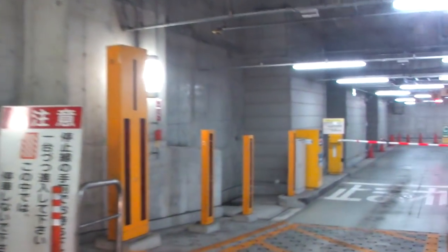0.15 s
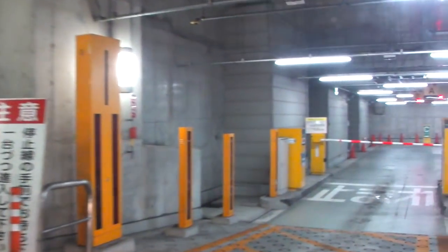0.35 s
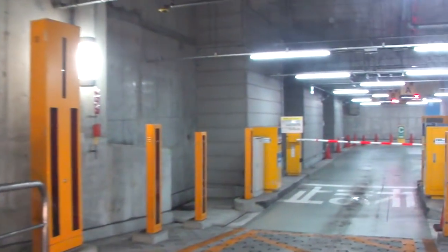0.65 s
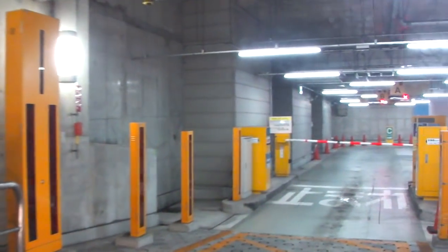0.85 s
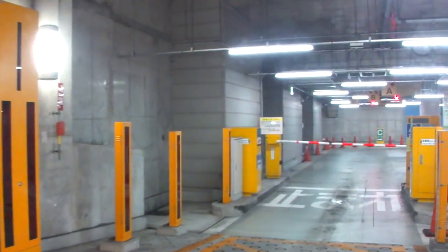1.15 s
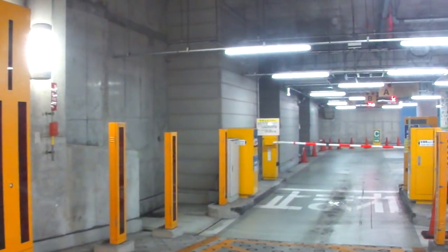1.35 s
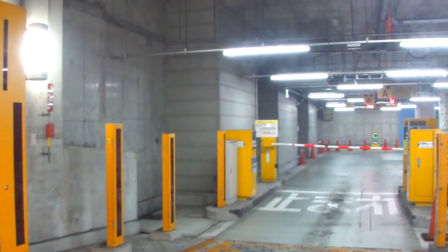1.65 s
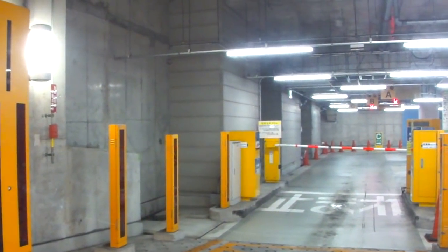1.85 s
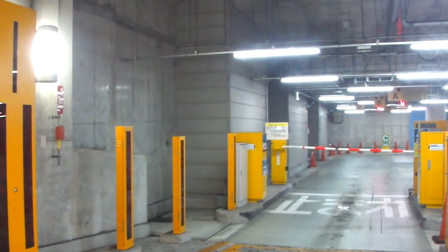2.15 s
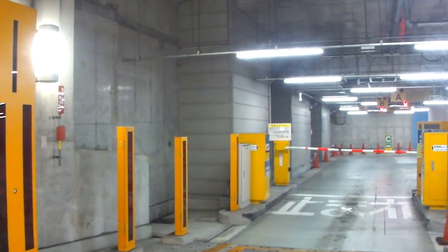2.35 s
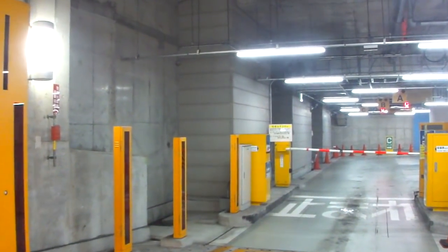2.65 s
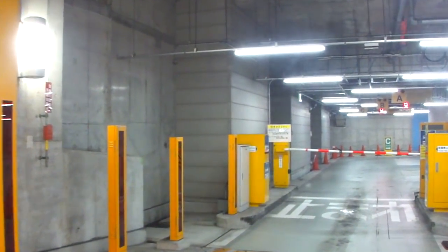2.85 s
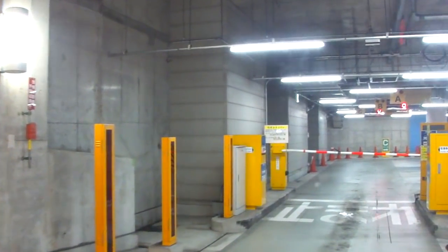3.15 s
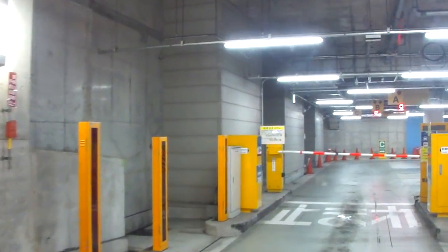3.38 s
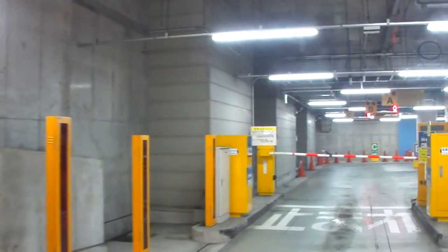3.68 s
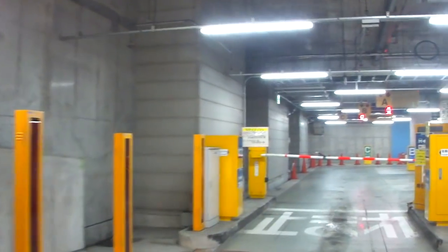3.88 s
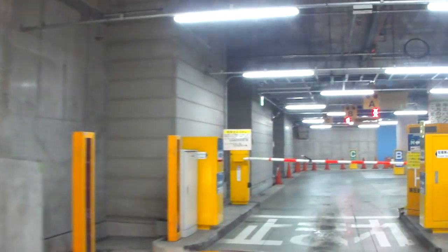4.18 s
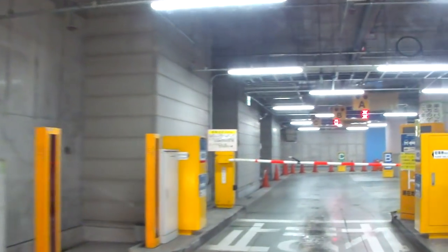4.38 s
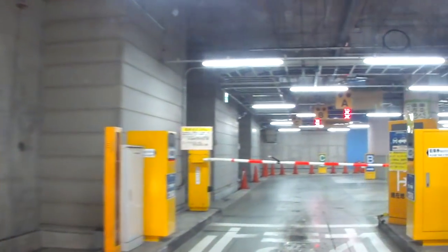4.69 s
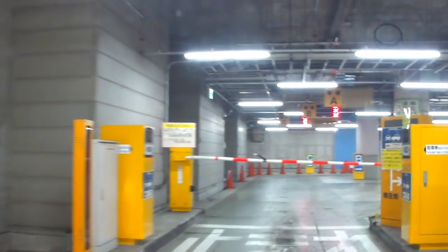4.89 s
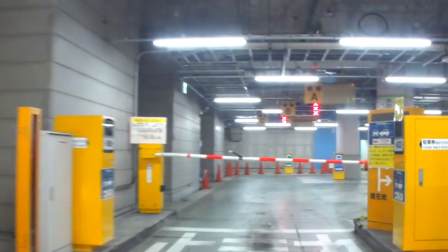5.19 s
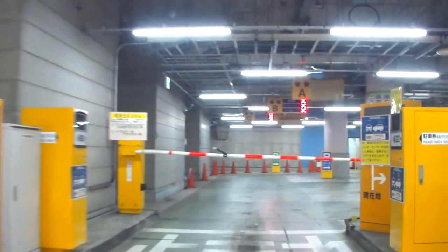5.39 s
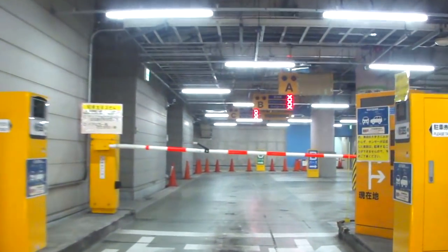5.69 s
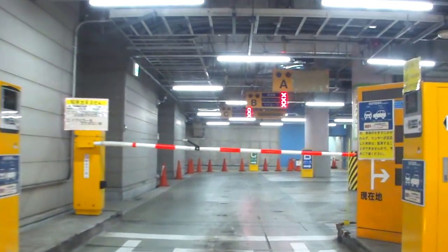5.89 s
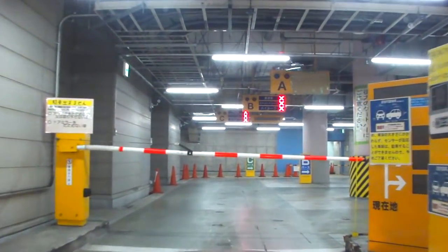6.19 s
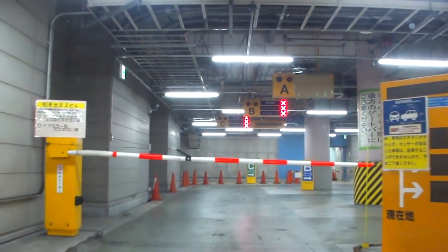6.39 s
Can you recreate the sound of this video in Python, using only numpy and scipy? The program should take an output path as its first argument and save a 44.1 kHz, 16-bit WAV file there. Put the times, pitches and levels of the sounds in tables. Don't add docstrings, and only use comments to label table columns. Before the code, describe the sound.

Muffled cabin rumble and a wavering drivetrain moan as a car rolls, slows, then rolls on over joints with thuds, ticks and faint hiss.

```python
import sys
import numpy as np
from scipy import signal
from scipy.io import wavfile
from scipy.ndimage import uniform_filter1d

SR = 44100
rng = np.random.default_rng(int(sys.argv[2]) if len(sys.argv) > 2 else 0)


def ratio_of_db(decibels):
    return 10 ** (np.asarray(decibels, float) / 20)


def wrap_up_sound(samples):
    columns = np.atleast_2d(samples).T
    tamed = np.clip(columns, -1, 1)
    steps = np.round(tamed * 32767).astype(np.int16)
    wavfile.write(sys.argv[1], SR, steps)


N = 288144


def evened(x):
    return x / np.sqrt(np.mean(x ** 2) + 1e-20)


def read(points, hz):
    f, value = np.transpose(points)
    return np.interp(np.log(hz + 1), np.log(f + 1), value)


def add(mix, start_s, sound):
    part = mix[..., round(start_s * SR):][..., :sound.shape[-1]]
    part += sound[..., :part.shape[-1]]


def resonate(x, hz, width_hz):
    turn = np.exp(2j * np.pi * np.cumsum(hz * np.ones(len(x))) / SR)
    r = np.exp(-np.pi * width_hz / SR)
    smooth = signal.lfilter([1 - r], [1, -r], x / turn + 1e-18)
    return 2 * (turn * smooth).real


def noise_band(length, hz, width_hz):
    once = resonate(rng.standard_normal(length), hz, width_hz)
    return resonate(once, hz, width_hz)


def ring(hz, t60_s, phase=0):
    t = np.arange(6000) / SR
    swell = np.sin(np.pi / 2 * np.minimum(t * hz, 1)) ** 2
    return ratio_of_db(-60 * t / t60_s) * np.sin(2 * np.pi * hz * t + phase) * swell


def field_axes(size):
    t = np.arange(-2, N * 4 // size + 6) * size / 4 / SR
    return np.fft.rfftfreq(size, 1 / SR), t


def field(level_db, same, lean_db, size, patchy_db, flicker_db):
    a, b, c, d, patches = rng.standard_normal((level_db.shape[1], size // 2 + 1, 5)).T
    flicker = evened(uniform_filter1d(patches, size // 16, 0))
    patches = uniform_filter1d(patches[::-1], size // 256 + 2, 0)
    patches = evened(uniform_filter1d(patches, 12, 1))
    same = np.clip(same, -1, 1)
    left = a + 1j * b
    right = same * left + np.sqrt(1 - same ** 2) * (c + 1j * d)
    z = np.array([left * ratio_of_db(lean_db / 2), right / ratio_of_db(lean_db / 2)])
    z *= ratio_of_db(level_db + patchy_db * patches + flicker_db * flicker)
    z *= np.sqrt(3 / 8)
    sound = signal.istft(z, nperseg=size, noverlap=size * 3 // 4)[1]
    return sound[:, size // 2:N + size // 2]


# low_hz [Hz], high_hz [Hz]
PART_BANDS = [(30, 130), (130, 400), (400, 1000), (1000, 2600)]
# level_db [dB], follow [dB per dB of shake]
PART_LEVELS = [(-61, 1.2), (-33, 0.98), (-30, 0.44), (-39.5, 1.15)]
# pitch_hz [Hz], level_db [dB per Hz]
RUMBLE_COLOUR = [(20, -26), (60, -6), (120, -10), (190, -2), (300, -8.5), (600, -13), (900, -11),
                 (1150, -16.5), (1600, -16.5), (2100, -18), (2700, -26), (3500, -37.5), (5000, -41),
                 (9000, -48.5)]
# pitch_hz [Hz], width_hz [Hz], lift_db [dB]
CABIN_MODES = [(206.5, 61, 4.5), (265, 48, 2.5), (310, 62, 2), (368, 47, 1), (484, 74, 3), (613, 23.4, -3),
               (715, 100, 0), (756, 61, 1.5), (860, 20, 1.5), (1206, 43, 1.5), (1312, 33, 5.5),
               (1476, 35, 7.5), (2154, 75, 4.5), (2334, 60, 4.5)]
# pitch_hz [Hz], likeness [0-1]
LIKENESS = [(30, .97), (60, .985), (200, .99), (450, .97), (800, .93), (1500, .8), (2200, .84), (3300, .55),
            (5000, .1)]
# pitch_hz [Hz], left_minus_right_db [dB]
STEREO_LEAN = [(60, -3.2), (200, -3.6), (700, -3.4), (1100, -2.7), (2000, -3), (3500, -2), (6000, -1)]
# time_s [s], shake_db [dB]
FLOOR_SHAKE = [(0, 1.5), (.3, 0), (.9, -1), (1.3, -.5), (1.75, -1), (2.1, -1), (2.45, -1.5), (2.85, -1.5),
               (3.1, 0), (3.35, 4), (3.55, 1.5), (4.0, 2), (4.4, 1.5), (5.0, 2), (5.55, 1.3), (5.9, 2.5),
               (6.2, 0.5), (6.53, -.5)]
# time_s [s], speed [0-1]
CAR_SPEED = [(0, 1), (.5, 1), (1.1, .1), (2.9, .15), (3.5, 1), (4.8, .9), (5.6, 0.3), (6.53, 0.6)]


def rumble(size=1024):
    hz, t = field_axes(size)
    modes = sum(lift_db / (1 + (2 * (hz - f) / w) ** 2) for f, w, lift_db in CABIN_MODES)
    colour = read(RUMBLE_COLOUR, hz) + modes
    shake_db = np.interp(t, *np.transpose(FLOOR_SHAKE))
    sums = [10 * np.log10(np.sum(ratio_of_db(2 * colour[(hz > lo) & (hz <= hi)]))) for lo, hi in PART_BANDS]
    lifts = np.array([db + follow * shake_db - total for (db, follow), total in zip(PART_LEVELS, sums)])
    boom_db_per_speed = 9.5
    lifts[0] += boom_db_per_speed * np.interp(t, *np.transpose(CAR_SPEED))
    centres = np.log(np.sqrt(np.prod(PART_BANDS, axis=1)))
    shares = np.array([np.interp(np.log(hz + 1), centres, row) for row in np.eye(len(PART_BANDS))])
    level_db = colour[:, None] + shares.T @ lifts
    same, lean_db = read(LIKENESS, hz)[:, None], read(STEREO_LEAN, hz)[:, None]
    return field(level_db, same, lean_db, size, patchy_db=0.65, flicker_db=0.091)


# time_s [s], pitch_hz [Hz], level_db [dB]
MOAN_GLIDE = [(0, 545, -51), (.25, 560, -41), (1.4, 569, -44), (1.8, 537, -44), (2.5, 529, -43.5),
              (3.05, 487, -40), (3.8, 501, -48.5), (4.4, 485, -45), (5.2, 522, -42), (5.7, 501, -42.5),
              (6.1, 505, -42), (6.53, 488, -45)]


def moan():
    time_s, pitch_hz, level_db = np.transpose(MOAN_GLIDE)
    t = np.arange(N) / SR
    band = noise_band(N, np.interp(t, time_s, pitch_hz), width_hz=52.2)
    return ratio_of_db(np.interp(t, time_s, level_db)) * evened(band)


# start_s [s], peak_db [dB], pitch_hz [Hz]
JOINTS = [(1.322, -16, 284), (2.913, -24, 210), (2.922, -14.5, 490), (3.132, -18, 238), (3.292, -25, 815),
          (3.335, -22, 346), (3.409, -16, 256), (3.455, -19, 214), (3.658, -19, 217), (3.702, -22, 488),
          (3.714, -19, 200), (4.113, -25, 480), (5.125, -23, 537), (5.726, -14.5, 596), (5.734, -19.5, 707),
          (5.754, -20, 668), (5.805, -17, 215), (5.839, -22, 473), (5.875, -19.5, 422), (5.899, -20, 332),
          (5.915, -20, 269), (6.069, -21, 485), (6.314, -19.5, 501), (1.372, -22, 300), (1.017, -22, 499),
          (2.0, -22.5, 783), (4.032, -19.5, 200), (5.772, -27, 746), (5.822, -18.5, 450), (5.858, -21, 232)]
# start_s [s], peak_db [dB], pitch_hz [Hz]
SUSPENSION_BUMPS = [
    (0.424, -31, 78),
    (2.175, -32, 118),
    (3.949, -52, 120),
    (4.659, -31, 60),
]


def thuds():
    out, t = np.zeros(N), np.arange(6000) / SR
    joint_t60_s, bump_t60_s = 0.12, 0.2
    blows = [(*row, joint_t60_s) for row in JOINTS] + [(*row, bump_t60_s) for row in SUSPENSION_BUMPS]
    for start_s, peak_db, hz, t60_s in blows:
        rush = evened(noise_band(len(t), hz, 1.1 * hz))
        rush *= ratio_of_db(-60 * t / t60_s) * np.minimum(t / 0.0041, 1)
        high_pass = signal.butter(2, hz / 2, "high", fs=SR)
        blow = signal.lfilter(*high_pass, ring(hz, t60_s) + 0.48 * rush)
        add(out, start_s, ratio_of_db(peak_db - 7.0) * blow)
    return out


# start_s [s], length_s [s], body_db [dB], centre_hz [Hz], edge_db [dB]
TRIM_RATTLES = [(0.562, 0.024, -45.5, 1100, -59), (0.975, 0.024, -41.5, 2100, -52),
                (0.998, 0.016, -34, 1510, -52), (1.024, 0.017, -38, 1300, -55),
                (1.205, 0.0074, -40, 1600, -50), (1.222, 0.0091, -33.5, 1750, -54),
                (1.303, .04, -46, 1220, -59), (1.369, 0.026, -40, 1700, -59),
                (1.431, 0.0028, -34, 900, -70), (1.616, 0.015, -46, 2400, -60),
                (2, .016, -39.5, 1600, -50.5), (3.17, 0.032, -44.5, 2260, -59.5),
                (3.294, 0.044, -42.5, 1380, -69), (5.072, 0.034, -45, 2100, -64),
                (5.743, 0.029, -48, 1210, -59), (5.904, 0.0071, -38.5, 2300, -48)]
# pitch_hz [Hz], t60_s [s], level_db [dB]
TRIM_BODY = [(710, 0.03, 9), (944, 0.013, 9), (1125, 0.049, -2), (1300, 0.022, 3), (1440, 0.022, 3),
             (1630, 0.031, -3.5), (1810, 0.034, 0), (2120, 0.019, 1), (2360, 0.034, -1.5),
             (2820, 0.0068, 4)]
# pitch_hz [Hz], t60_s [s], level_db [dB]
METAL_CLIP = [(3350, .02, -8), (3600, 0.037, -1.5), (3670, .02, -9)]
# pitch_hz [Hz], width_hz [Hz], level_db [dB]
BRIGHT_EDGE = [(4400, 900, -10), (6600, 2700, 5.5), (9200, 1500, -13)]


def rattles():
    out, t = np.zeros((2, N)), np.arange(4000) / SR
    clip_under_edge_db = 7.5
    for start_s, length_s, body_db, centre_hz, edge_db in TRIM_RATTLES:
        draws = rng.random((2, 4000))
        knocks = (draws[0] < 1200 / SR) * (2 * draws[1] - 1) * (t < length_s)
        knocks[0] = 0.99
        knocks = knocks / np.linalg.norm(knocks) * np.sqrt(length_s * 700)
        near = [(f, t60_s, db - 13.0 * np.log2(f / centre_hz) ** 2) for f, t60_s, db in TRIM_BODY]
        for modes, db, spread in ((near, body_db, .02), (METAL_CLIP, edge_db - clip_under_edge_db, .005)):
            shift, *phases = rng.standard_normal((len(modes), 3)).T
            shape = sum(ratio_of_db(d) * ring(f * (1 + spread * w), t60_s, 0.4 * np.array([[left], [right]]))
                        for (f, t60_s, d), w, left, right in zip(modes, shift, *phases))
            struck = signal.fftconvolve(knocks[None], shape, axes=1)
            add(out, start_s, ratio_of_db(db) * struck * ratio_of_db([[-1.3], [1.3]]))
        puffs = np.sqrt(abs(signal.fftconvolve(knocks ** 2, ratio_of_db(-120 * t / 0.062))[:4000]))
        grit = [sum(ratio_of_db(d) * resonate(z * puffs, f, w) for f, w, d in BRIGHT_EDGE)
                for z in rng.standard_normal((2, 4000))]
        add(out, start_s, ratio_of_db(edge_db) * np.array(grit))
    return out


# start_s [s], peak_db [dB], pitch_hz [Hz], second_hz [Hz], snap_db [dB]; rows ringing near 3.6 kHz are
TICKS = [(.978, -43, 3520, 2120, -52), (1.004, -31.5, 3600, 2360, -50),
         (1.018, -40, 3560, 1810, -54), (1.2232, -29, 3700, 6760, -38),
         (1.3079, -39, 3580, 6950, -54), (1.323, -44, 3600, 7900, -54),
         (2.813, -28.5, 7926, 9200, -36), (2.82, -35, 8080, 7600, -47),
         (2.86, -58, 6100, 9000, -47), (4.8657, -45, 7660, 6370, -41.5),
         (4.928, -52, 7450, 8000, -51), (5.9084, -32, 5380, 7300, -37.5),
         (6.526, -42, 7200, 10400, -40), (.991, -40, 3560, 6900, -54),
         (1.031, -44, 3580, 2000, -56), (1.338, -46, 3600, 2200, -58)]


def ticks():
    out, t = np.zeros((2, N)), np.arange(6000) / SR
    left_minus_right_db = -1
    lean = ratio_of_db([[left_minus_right_db / 2], [-left_minus_right_db / 2]])
    for start_s, peak_db, hz, second_hz, snap_db in TICKS:
        snap = np.array([resonate(z, 8400.0, 7000.0) for z in rng.standard_normal((2, len(t)))])
        snap *= ratio_of_db(snap_db)
        snap *= 1.8 * ratio_of_db(-60 * t / 0.0052) + 0.52 * ratio_of_db(-60 * t / 0.13)
        phases = rng.uniform(-0.8, 0.87, (2, 2, 1))
        rings = ring(hz, 0.022, phases[0]) + .5 * ring(second_hz, 0.014, phases[1])
        add(out, start_s, (ratio_of_db(peak_db) * rings + snap) * lean)
    return out


# start_s [s], length_s [s], pitch_hz [Hz], level_db [dB]
PANEL_WHIRRS = [
    (2.6, 0.39, 1190, -49),
    (2.9, 0.56, 1460, -53),
    (4.5, .3, 1300, -59),
    (5.55, 0.42, 2120, -53),
    (2.2, .2, 1900, -62),
]


def whirrs():
    out = np.zeros(N)
    for start_s, length_s, hz, level_db in PANEL_WHIRRS:
        band = noise_band(20000, hz, 35.)[-round(length_s * SR):]
        add(out, start_s, ratio_of_db(level_db) * evened(band) * np.hanning(len(band)))
    return out


# start_s [s], level_db [dB], t60_s [s]
KEY_SHIVERS = [
    (.6, -60, 6),
    (.98, -66, 1.5),
    (5.63, -52, 0.1),
    (5.738, -47.5, 0.6),
    (5.94, -60, 1.5),
]
# pitch_hz [Hz], width_hz [Hz], level_db [dB]
KEY_MODES = [(6485, 330, 2), (9000, 280, -3), (5560, 240, -10)]


def shivers():
    t = np.arange(N) / SR
    level = sum(ratio_of_db(db - 60 * np.maximum(t - start_s, 0) / t60_s) * (t >= start_s)
                for start_s, db, t60_s in KEY_SHIVERS)
    contacts = rng.standard_normal((2, N)) * (rng.random(N) < 4000 / SR)
    rings = [sum(ratio_of_db(db) * resonate(c, hz, w) for hz, w, db in KEY_MODES) for c in contacts]
    return level * evened(np.array(rings))


# pitch_hz [Hz], level_db [dB]
HISS_SHAPE = [(150, -25), (1500, 11), (3500, -5), (4500, -9), (5500, -1), (7000, 0.5), (8500, -0.5),
              (9100, 4), (10000, 0), (11000, -3.5), (13000, -27)]


def hiss(size=512):
    hz, t = field_axes(size)
    colour = read(HISS_SHAPE, hz)
    colour = colour - 10 * np.log10(np.sum(ratio_of_db(2 * colour[(hz > 5500) & (hz < 10500)])))
    hiss_db, db_per_shake = -51, -0.12
    level_db = colour[:, None] + hiss_db + db_per_shake * np.interp(t, *np.transpose(FLOOR_SHAKE))
    return field(level_db, same=0.06, lean_db=-1.7, size=size, patchy_db=1.0, flicker_db=.6)


def scene():
    low = (moan() + whirrs() + thuds()) * ratio_of_db([[-1.8], [1.7]])
    return rumble() + low + ticks() + rattles() + shivers() + hiss()


def low_pass(x):
    return signal.sosfilt(signal.butter(12, 11700, fs=SR, output="sos"), x)


# pitch_hz [Hz], width_hz [Hz]
NOTCH_FILTERS = [(2998, 1090), (3983, 800), (4987, 800), (3010, 139), (4020, 101), (5040, 150)]


def record(dry):
    bass_hz, top_stop_hz = 44.8, 13870.5
    mix = signal.sosfilt(signal.butter(2, bass_hz, "high", fs=SR, output="sos"), dry)
    mix = signal.sosfilt(signal.cheby2(5, 45, top_stop_hz, fs=SR, output="sos"), mix)
    for hz, width_hz in NOTCH_FILTERS:
        mix = signal.lfilter(*signal.iirnotch(hz, hz / width_hz, SR), mix)
    return low_pass(mix)


dry = scene()
out = record(dry)
wrap_up_sound(out)
```